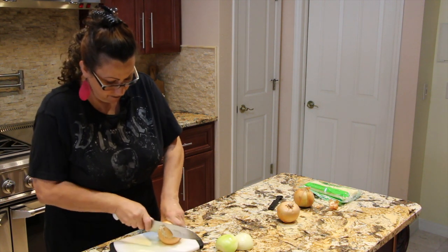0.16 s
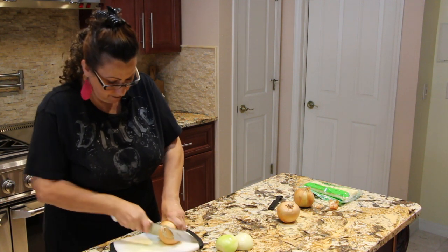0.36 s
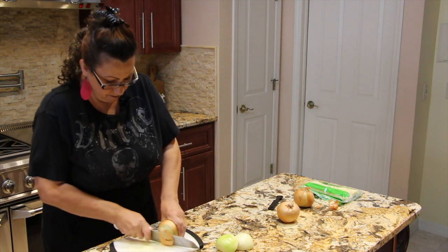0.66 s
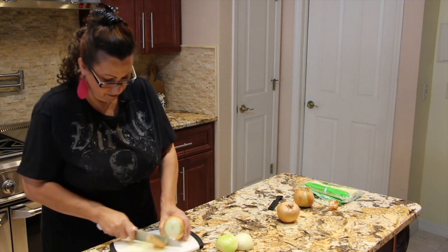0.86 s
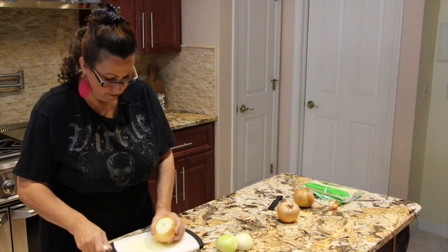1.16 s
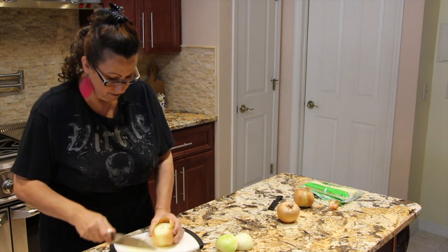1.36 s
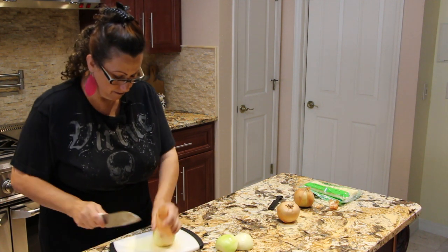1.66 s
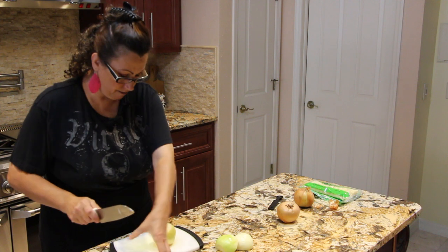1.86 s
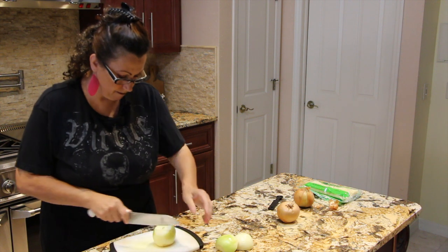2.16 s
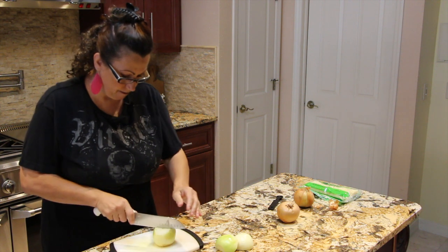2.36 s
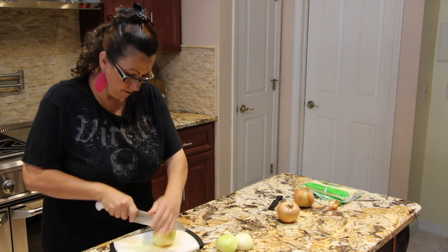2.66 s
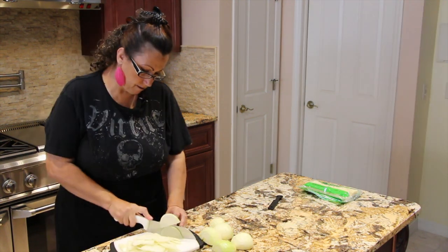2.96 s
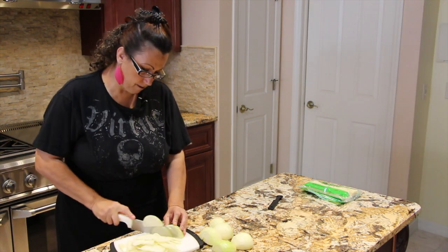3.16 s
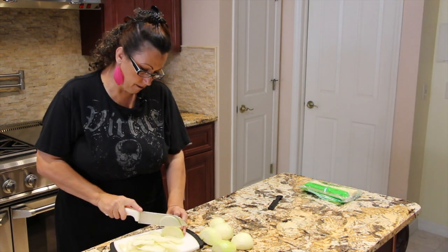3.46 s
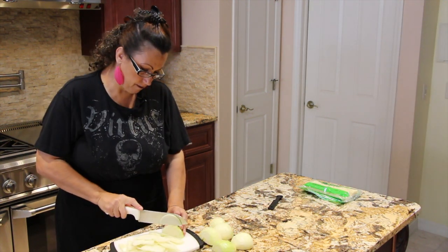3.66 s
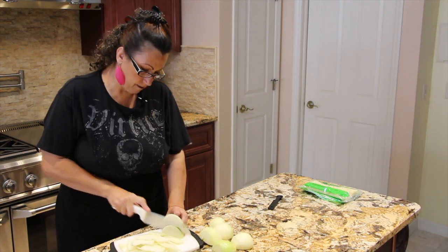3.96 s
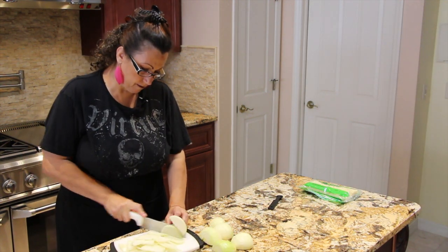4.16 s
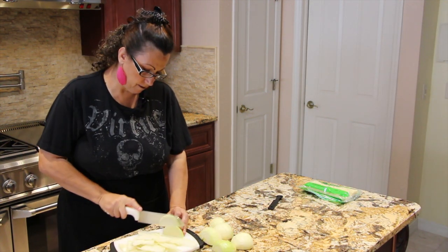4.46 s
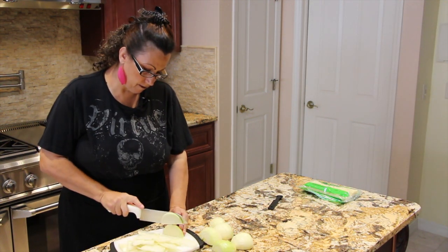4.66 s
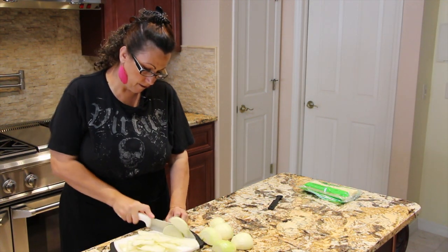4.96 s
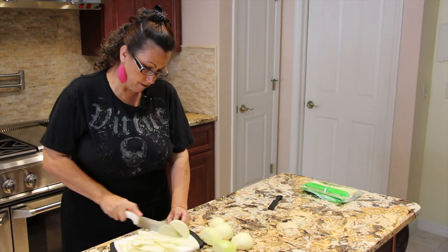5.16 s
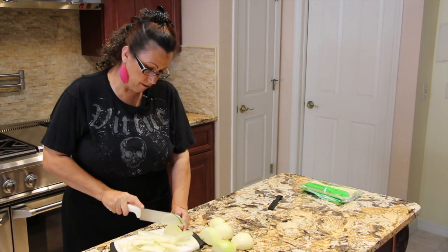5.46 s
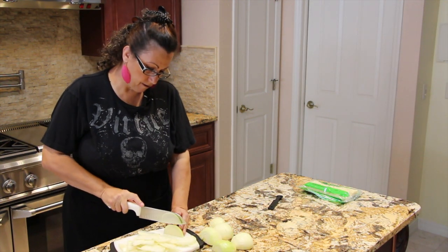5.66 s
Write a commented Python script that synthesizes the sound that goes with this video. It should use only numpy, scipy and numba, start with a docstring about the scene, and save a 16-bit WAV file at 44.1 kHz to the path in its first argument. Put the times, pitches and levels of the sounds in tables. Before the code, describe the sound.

Close, wet-crisp onion slicing with sharp blade knocks on a cutting board, papery handling, and quiet kitchen hum and hiss.

```python
"""Slicing an onion in a kitchen

A knife saws and slices through an onion on a thin board on a stone worktop, close to a small camera.
Bursting cells are random clicks through moving filters: a bright crunch, a thin sizzle, a hollow body.
Short ticks (knocks with noise sprays) and dry rustles join in, the blade knocks the board hard enough to
clip, and its steel rings in one group of taps (fading sines). A hard-walled kitchen answers with echoes of
fading noise, over filtered noise for room air, appliance hum, a high whine and microphone hiss."""
import sys
import numpy as np
from scipy import signal
from scipy.fft import rfft, irfft
from scipy.io import wavfile
from scipy.ndimage import uniform_filter1d
from numba import njit

SR = 44100
rng = np.random.default_rng(int(sys.argv[2]) if len(sys.argv) > 2 else 0)


def dump_mix(stems):
    """Bounce the given channels to the path in sys.argv[1] as a 16-bit WAV at rate SR."""
    frames = np.atleast_2d(stems).T  # one column per channel
    limited = np.clip(frames, -1, 1)  # hard clip at full scale
    pcm = np.round(limited * 32767).astype(np.int16)
    wavfile.write(sys.argv[1], SR, pcm)


N = 255780
T = np.arange(N) / SR
SIDES = np.array([[1], [-1]])  # opposite signs in the left and right channels

# broad spray around the moving centre of the crunch: (f/Hz, width/Hz, level/dB)
CRUNCH_SPRAY = [(4630, 1500, 2.5), (6560, 2300, 2.5), (8540, 2600, 4.5)]
# board under the onion: (f/Hz, width/Hz, level/dB)
BOARD_UNDER_ONION = [(544, 110, 5), (1190, 460, 1.5)]


def strokes():
    """Bursting cells excite a bright crunch, a thin sizzle and the hollow body of the onion."""
    levels, centre = controls()
    # the colour wanders as layers of different thickness give way
    crunch_hz = centre[0] * (1 + 0.074 * walk(60))
    body_hz = centre[1] * (1 + 0.045 * walk(40))
    # the blade sticks and slips
    gains = uniform_filter1d(levels, size=44) * undb(0.39 * walk(80))
    burst = cells(12000, spread_db=2.5)
    deep = cells(5000, spread_db=2.0)

    moving_crunch = unit(svf(burst, crunch_hz, 1250.0))
    crunch = undb(0.5) * moving_crunch + resonances(band(burst, 3000, 7700), CRUNCH_SPRAY)
    # lone fibres snap; the pitch is drawn anew every 200 samples
    pitch_steps = np.repeat(undb(1.54 * rng.standard_normal(N // 200 + 1)), 200)[:N]
    snap_hz = (crunch_hz * pitch_steps).clip(2000, 12000)
    snaps = unit(svf(cells(90, spread_db=3.0), snap_hz, 540.0))
    crunch = unit(crunch) + undb(-8) * snaps

    # the lower the body sounds, the more the board under it joins in
    board_gain = undb(-8 - 35 * np.log2(body_hz / 1200))
    board = board_gain * resonances(band(deep, 840, 820), BOARD_UNDER_ONION)
    hollow = svf(svf(deep, body_hz, 1900.0), body_hz, 1900.0)
    body = unit(hollow) + board

    sizzle = unit(band(band(burst, 9760, 7800), 9400, 8300))
    return gains[0] * unit(crunch) + gains[1] * unit(body) + gains[2] * sizzle


# pushes and drags of the blade through the onion and along the board,
# with scrapes and swells after the chops:
# (full from t/s, rise t/s, hold t/s, fall t/s, crunch level/dB, crunch centre f/Hz,
#  onion body level/dB, body centre f/Hz, sizzle level/dB)
BLADE_MOVES = [(0.005, 0.046, 0.0056, 0.04, -44, 6960, -46.5, 1300, -52),
               (0.039, 0.035, .015, 0.035, -44, 7350, -46, 1150, -41.5),
               (0.159, .04, 0.029, 0.034, -34.5, 7000, -36, 1490, -38),
               (0.277, .05, 0.038, 0.046, -43.5, 6550, -45, 1350, -49),
               (0.36, .004, .03, 0.017, -42.5, 7560, -42.5, 1500, -54),
               (0.405, 0.016, 0.032, .045, -31, 6600, -34, 1570, -40),
               (0.523, 0.032, 0.041, 0.029, -38, 7240, -36, 1760, -52),
               (0.655, 0.043, 0.027, 0.0038, -28, 6700, -31, 1720, -37.5),
               (0.701, .03, 0.038, .06, -35.5, 6500, -39, 1150, -52),
               (0.787, 0.03, 0.048, 0.11, -32, 5650, -39.5, 1210, -52),
               (0.921, 0.012, 0.0079, 0.0024, -29, 5100, -32, 1930, -60),
               (1.03, 0.0021, 0.029, .015, -38.5, 4630, -30.5, 1640, -55),
               (1.094, 0.025, .015, 0.039, -41.5, 4400, -43.5, 1470, -57),
               (1.228, 0.018, .004, 0.0027, -43.5, 6160, -41, 1420, -52),
               (2.753, 0.0026, 0.0031, 0.0053, -38, 5400, -45, 1410, -56),
               (2.771, 0.0037, 0.021, 0.014, -37, 5300, -38, 1330, -53),
               (2.862, 0.086, .03, 0.06, -49, 6800, -48.5, 1350, -60),
               (2.921, .003, 0.0086, 0.016, -41.5, 6300, -45, 1560, -60),
               (2.936, .005, 0.04, 0.023, -37, 5800, -35, 1270, -46),
               (3.073, 0.056, 0.023, 0.04, -54, 5400, -52, 1400, -65),
               (3.118, 0.027, 0.029, 0.051, -52, 5600, -45, 2050, -70),
               (3.908, 0.0023, 0.022, 0.028, -43.5, 5760, -46.5, 910, -52),
               (3.963, .004, 0.072, 0.034, -37.5, 5970, -39, 1050, -54),
               (4.05, 0.034, .022, .003, -31, 5540, -35.5, 1180, -44),
               (4.12, 0.045, .02, 0.093, -62, 4900, -39, 1210, -56),
               (4.185, .08, 0.027, .11, -50, 6400, -46, 1310, -61),
               (4.437, .003, 0.0028, 0.031, -55, 4200, -47.5, 1090, -66),
               (4.866, .003, 0.028, .005, -44.5, 5640, -46, 1190, -51),
               (4.903, .003, 0.078, 0.033, -36.5, 5700, -39, 1120, -46),
               (5.0, .03, 0.02, 0.0035, -35, 6200, -34, 1280, -45),
               (5.024, .006, .003, .05, -49, 7040, -44, 1000, -50),
               (5.173, 0.1, 0.043, 0.073, -57.5, 5900, -50.5, 1490, -68)]
FADE_DB, FADE_CURVE = 13.5, 0.99  # drop one rise or fall time away from the hold; power of the time


def controls():
    """Crunch, body and sizzle levels from the summed power of all moves; louder ones weigh more in colour."""
    power, weighted_hz = rustle()
    for start, rise, hold, fall, crunch_db, crunch_hz, body_db, body_hz, sizzle_db in BLADE_MOVES:
        first = max(int((start - 4 * rise) * SR), 0)
        span = slice(first, int((start + hold + 4 * fall) * SR))
        before = (start - T[span]) / rise
        after = (T[span] - start - hold) / fall
        away = np.maximum(before, after).clip(0)
        full_db = np.array([[crunch_db], [body_db], [sizzle_db]])
        move = undb(full_db - FADE_DB * away ** FADE_CURVE) ** 2
        power[:, span] += move
        weighted_hz[:, span] += move[:2] * [[crunch_hz], [body_hz]]
    return np.sqrt(power), weighted_hz / power[:2]


# fingers handle the cut end and its dry skin: (t/s, crunch level/dB, onion body level/dB)
HANDLING = [(.93, -48, -45), (1.0, -47.5, -58), (1.03, -38.5, -54), (1.13, -49.5, -50), (1.17, -46, -48),
            (1.215, -47, -56), (1.25, -41.5, -54), (1.3, -44.5, -46.5), (1.38, -62, -61), (1.4, -53, -43),
            (1.47, -48, -55), (1.52, -51.5, -49), (1.58, -49.5, -57), (1.675, -66, -61), (1.69, -49.5, -58),
            (1.77, -51.5, -51), (1.9, -58, -55.5), (2.0, -54, -57), (2.08, -69, -70)]
RUSTLE_HZ, RUSTLE_BODY_HZ = 5400, 1450
RUSTLE_SIZZLE_DB = -11  # relative to the crunch


def rustle():
    """Handling is a gliding level of crunch, body and sizzle at fixed colours, given as power."""
    t, crunch_db, body_db = np.transpose(HANDLING)
    levels_db = (crunch_db, body_db, crunch_db + RUSTLE_SIZZLE_DB)
    hand = undb([np.interp(T, t, db, -140, -140) for db in levels_db]) ** 2
    power = hand + 1e-14  # a tiny floor avoids division by zero
    return power, power[:2] * [[RUSTLE_HZ], [RUSTLE_BODY_HZ]]


# blade lands on the board: (t/s, blow level/dB, ring f/Hz, ring t60/s, landing t/ms,
#  room share level/dB, room band from f/Hz, room band to f/Hz)
CHOP_BLOWS = [(0.6763, 4.5, 1080, 0.0072, 0.54, -35.5, 460, 2050),
              (2.9773, 3.5, 1177, 0.0085, 2.14, -40, 503, 1490),
              (4.069, 12.5, 1320, 0.0042, 0.78, -41.5, 883, 2030),
              (5.0185, -2.5, 1000, 0.011, 1.87, -35, 494, 1510)]
# modes of the board: (multiple of the ring f, level/dB)
BOARD_MODES = [(1, 5), (.62, -5.5), (.17, -20.5), (1.6, -6), (3.3, -30)]
# cupboard under the worktop: (f/Hz, width/Hz, level/dB)
CUPBOARD = [(509, 15, 1), (752, 27, 4), (1100, 92, -3.5), (1320, 32, -6)]
# low thumps of the worktop: (t/s, level/dB)
WORKTOP_THUMPS = [(0.674, -46), (1.317, -39), (2.78, -45.5), (4.07, -54)]
THUMP_HZ, THUMP_T60_S = 58, 0.29


def chops():
    """The edge lands within a few milliseconds and rings the damped board; duller blows go to the walls."""
    near, far = np.zeros(N), np.zeros(N)
    for start, db, hz, t60, landing_ms, room_db, low_hz, high_hz in CHOP_BLOWS:
        landing = np.minimum(np.arange(int(.1 * SR)) / (landing_ms * SR / 1000), 1) ** 2
        board = sum(undb(mode_db) * ring(hz * multiple, t60 / np.sqrt(multiple), .1)
                    for multiple, mode_db in BOARD_MODES)
        add(near, start, undb(db) * landing * board)
        # what reaches the walls has lost its edges
        dull = undb(db + room_db) * np.pad(np.hanning(16), (0, 4000))
        cupboard = sum(undb(level_db) * band(dull, f, width) for f, width, level_db in CUPBOARD)
        dull = dull + undb(1.5) * cupboard
        room_band = signal.butter(N=4, Wn=[low_hz, high_hz], btype="band", fs=SR, output="sos")
        add(far, start, signal.sosfilt(room_band, dull))
        add(far, start, undb(-7.0) * band(band(dull, 256, 340), 256, 340))
    for start, db in WORKTOP_THUMPS:
        add(near, start, undb(db) * ring(THUMP_HZ, THUMP_T60_S))
    return near, far


# short ticks: skin snaps, small knocks and the bright cracks of two chops:
# (t/s, knock peak level/dB, knock f/Hz, spray peak level/dB, spray f/Hz)
SHORT_TICKS = [(0.013, -44, 1400, -28, 7900), (0.079, -31, 2920, -29, 7300), (0.231, -27, 1710, -26, 4540),
               (0.26, -52, 2970, -31, 8300), (0.356, -31, 2920, -23, 8500), (0.396, -27, 1130, -23, 7400),
               (0.404, -12.5, 2240, -19, 6300), (0.407, -18.5, 880, -11, 6000),
               (0.415, -36, 1690, -22, 7800), (0.529, -16, 2020, -40, 6600), (0.621, -18, 2240, -35, 7300),
               (0.6767, -28, 2900, -20, 6000), (0.8204, -36, 1220, -14, 7000),
               (0.824, -38, 1270, -14, 6600), (0.863, -46, 1680, -22, 5800),
               (0.926, -15, 2880, -13.5, 5060), (1.023, -39, 2650, -22, 4960),
               (1.086, -38, 2750, -22, 4900), (1.1, -26, 730, -26, 5800), (1.164, -27, 2070, -27.5, 7250),
               (1.182, -36, 2510, -32, 5000), (1.22, -29, 1440, -28, 5960), (1.233, -20.5, 1400, -22, 5700),
               (1.242, -32, 2820, -21, 6640), (1.251, -52, 1570, -26, 5800), (1.311, -22, 1050, -45, 6200),
               (1.388, -25, 1560, -35, 5470), (1.399, -22, 1450, -37, 5500), (1.479, -30, 2210, -33, 6600),
               (1.52, -30, 1900, -51, 6700), (1.554, -44, 1460, -34, 6500), (1.629, -35, 2000, -48, 5700),
               (1.704, -31.5, 1910, -36, 5300), (1.758, -20, 1930, -16.5, 6400),
               (1.928, -39, 450, -35, 4770), (1.94, -30, 2950, -29, 6600), (1.967, -30, 2800, -27.5, 8800),
               (2.862, -45, 1130, -36, 6700), (2.92, -19, 2240, -35, 6900), (2.941, -17.5, 1340, -17, 5360),
               (3.417, -35, 725, -56, 8600), (3.553, -35.5, 1820, -51, 7500), (3.908, -24, 1270, -20, 7240),
               (3.985, -32, 530, -20, 6400), (4.002, -22.5, 575, -18.5, 5150),
               (4.019, -22.5, 550, -21, 5000), (4.069, -25, 2900, -17, 4600),
               (4.439, -26.5, 1110, -32, 4580), (4.912, -22, 1280, -31, 5800),
               (4.927, -33, 1390, -28, 5370), (4.939, -39, 1060, -21, 6600),
               (4.977, -17.5, 1070, -20, 5700), (5.027, -15.5, 920, -44, 7400), (5.59, -37, 626, -39, 6700)]
SPRAY_MS, SPRAY_ONSET_S = 0.92, 0.00018  # time constants of fading and starting


def ticks():
    """Each tick is a brief low knock plus a spray of treble."""
    out = np.zeros(N)
    t = np.arange(1500) / SR
    envelope = np.exp(-1000 * t / SPRAY_MS) * (1 - np.exp(-t / SPRAY_ONSET_S))
    noises = rng.standard_normal((len(SHORT_TICKS), 1500))
    for (start, knock_db, knock_hz, spray_db, spray_hz), noise in zip(SHORT_TICKS, noises):
        width = 0.92 * spray_hz
        spray = band(band(noise * envelope, spray_hz, width), spray_hz, width)
        knock = ring(knock_hz, 9 / knock_hz, len(t) / SR)  # dies in nine cycles
        add(out, start, undb(knock_db) * knock + undb(spray_db) * spray / np.abs(spray).max())
    return out


# modes of the steel: (f/Hz, level/dB, t60/s)
STEEL_MODES = [(1478, -3, 0.26), (4258, -6, 0.09), (716, -26, 0.11), (1740, -5.6, 0.04), (2000, -12, .025),
               (2700, -18, 0.022), (4800, -7.5, 0.037), (5700, -8.5, 0.035)]
# the flat of the blade is tapped: (t/s, level/dB, tilt in dB per octave about 1500 Hz)
BLADE_TAPS = [(1.029, -26, 3.5), (1.036, -30.5, 2), (1.042, -34, -5), (1.048, -49, 16), (1.0551, -24, -2),
              (1.099, -28, 4.5), (1.114, -40, 6.5)]
BLADE_SCATTER_S = .0003  # detuning of a mode from tap to tap, as a share, times its t60


def blade():
    """Each tap rings the modes of the steel; a harder contact favours the high ones."""
    out = np.zeros(N)
    scatters = rng.standard_normal((len(BLADE_TAPS), len(STEEL_MODES)))
    for (start, db, tilt_db), scatter in zip(BLADE_TAPS, scatters):
        for (hz, mode_db, t60), draw in zip(STEEL_MODES, scatter):
            level_db = db + mode_db + tilt_db * np.log2(hz / 1500)
            detuned_hz = hz * (1 + BLADE_SCATTER_S * draw / t60)
            add(out, start, undb(level_db) * ring(detuned_hz, t60))
    return out


# how long the kitchen's echoes last in each band: (f/Hz, t60/s)
ROOM_DECAY = [(250, 0.47), (700, 0.42), (1400, 0.74), (3000, 0.56), (7000, 0.13), (13000, 0.45)]


def kitchen(x, build_s=0.0077):
    """Diffuse echoes build up, then die at a rate set band by band; nearly alike at both microphones."""
    t = np.arange(SR) / SR
    build = 1 - np.exp(-t / build_s)

    def echoes():
        tail = sum(band(rng.standard_normal(SR), hz, hz) * 1000. ** (-t / t60) for hz, t60 in ROOM_DECAY)
        return signal.fftconvolve(x, tail * build)[:N]

    return echoes() + undb(-67) * echoes() * SIDES


# colour of the room air, before its overall level is set: (f/Hz, level per Hz/dB)
AIR_COLOUR = [(12, -50), (20, -12), (65, -18), (89, -17), (176, -2.5), (240, -13.5), (276, -0.5),
              (309, -11), (356, -11.5), (644, -13), (784, -15), (1160, -19.5), (15600, -25), (17000, -28)]
AIR_DB = -50
# appliance tones: (f/Hz, level/dB, width/Hz)
APPLIANCE_HUM = [(65, -63, 17), (125.5, -58.5, 14.6), (172, -72, 4.6), (229.7, -61, 17), (342.7, -58, 15)]
# one thin steady tone: (f/Hz, level/dB, width/Hz)
HIGH_WHINE = (15735, -72, 3)
# colour of the microphone hiss, before its overall level is set: (f/Hz, level per Hz/dB)
HISS_COLOUR = [(12, -30), (20, 8), (43, -6), (140, -5), (268, -6.5), (784, -8.5), (15600, -9.5),
               (17000, -16)]
HISS_DB = -54


def background():
    """Room air and wavering appliance tones in the middle, microphone hiss at the sides."""
    air = undb(AIR_DB + 0.38 * walk(2.66)) * coloured(AIR_COLOUR)
    # noise squeezed into a narrow band wavers like a tone
    hum = sum(undb(db) * unit(band(rng.standard_normal(N), hz, width))
              for hz, db, width in APPLIANCE_HUM + [HIGH_WHINE])
    hiss = undb(HISS_DB) * coloured(HISS_COLOUR)
    return air + hum + hiss * SIDES


def undb(db):
    """Turn decibels into an amplitude factor."""
    return 10 ** (np.asarray(db, float) / 20)


def unit(x):
    """Scale to an RMS level of 1."""
    return x / np.sqrt(np.mean(x ** 2))


def band(x, hz, width_hz):
    """One resonance, gain 1 at the centre."""
    hz = min(hz, .45 * SR)
    b, a = signal.iirpeak(hz, hz / min(width_hz, .4 * SR), fs=SR)
    return signal.lfilter(b, a, x)


def resonances(x, table):
    """Several resonances side by side, scaled together to an RMS level of 1."""
    return unit(sum(undb(db) * band(x, hz, width) for hz, width, db in table))


def coloured(points):
    """Noise whose spectrum follows the given points, at an RMS level of 1."""
    hz, db = np.transpose(points)
    log_f = np.log(np.fft.rfftfreq(N, 1 / SR) + 1)
    shape = undb(np.interp(log_f, np.log(hz), db))
    return unit(irfft(rfft(rng.standard_normal(N)) * shape, N))


def walk(rate):
    """Random levels that glide to a new value every 1 / rate seconds; spread near 1."""
    step = int(SR / rate)
    held = np.repeat(rng.standard_normal(N // step + 1), step)
    return unit(uniform_filter1d(held, step)[:N])


def ring(hz, t60, length=.6):
    """A sine that fades by 60 dB in t60 seconds."""
    t = np.arange(int(length * SR)) / SR
    return np.sin(2 * np.pi * hz * t) * 1000. ** (-t / t60)


def add(out, start, x):
    """Mix a short sound in at a time in seconds."""
    i = int(start * SR)
    out[i:i + len(x)] += x[:len(out) - i]


def cells(rate, spread_db):
    """One-sample bursts, on average rate per second, most small and a few large."""
    hit, size, sign = rng.random((3, N))
    heights = undb(-spread_db * np.log(size))
    return unit((hit < rate / SR) * heights * np.sign(sign - .5))


@njit
def svf(x, hz, width):
    """Band-pass whose centre moves; gain 1 at the centre."""
    y, b, l = np.empty(len(x)), 0., 0.  # b and l: the band and low memories of the filter
    for i in range(len(x)):
        g, k = np.tan(np.pi * hz[i] / SR), width / hz[i]
        v = (b + g * (x[i] - l)) / (1 + g * (g + k))
        b, l, y[i] = 2 * v - b, l + 2 * g * v, k * v
    return y


def scene():
    """Mix the knife work, its echoes and the background in stereo."""
    near, far = chops()
    # the close sounds fall away above 13 kHz
    soften = signal.butter(N=2, Wn=13000, fs=SR, output="sos")
    light = signal.sosfilt(soften, strokes() + ticks() + blade())
    # treble arrives a little apart at the two ports
    late = np.pad(light, (3, 0))[:N]
    treble = undb(-40) * band(late, 6000, 6000) * SIDES
    echoes = kitchen(far + undb(-43.5) * light)
    return light + near + treble + echoes + background()


CLIP, TOP_HZ = .42, 16600  # largest amplitude let through; upper edge of the sound


def record(dry):
    """The loudest blows clip; the top is cut."""
    low_pass = signal.ellip(10, .2, 70, TOP_HZ, fs=SR, output="sos")
    return signal.sosfilt(low_pass, np.clip(dry, -CLIP, CLIP))


dry = scene()
out = record(dry)
dump_mix(out)
```